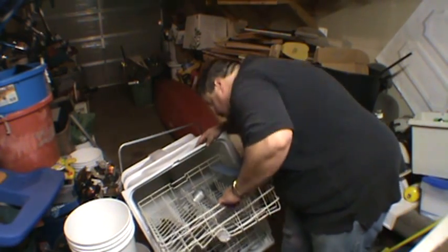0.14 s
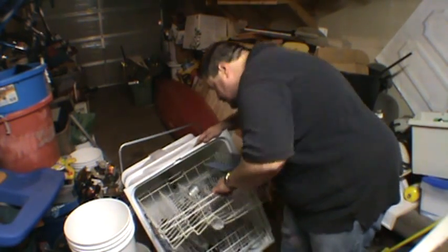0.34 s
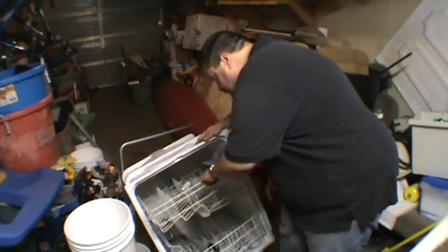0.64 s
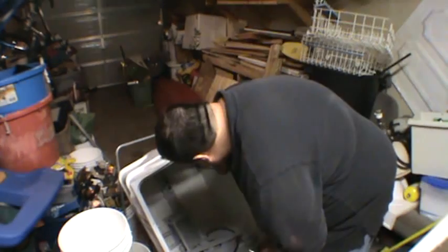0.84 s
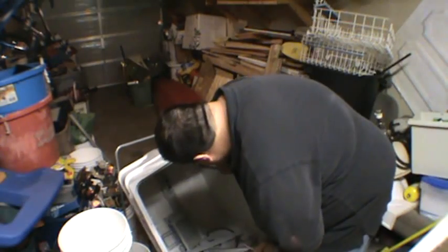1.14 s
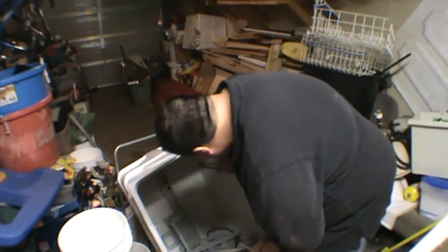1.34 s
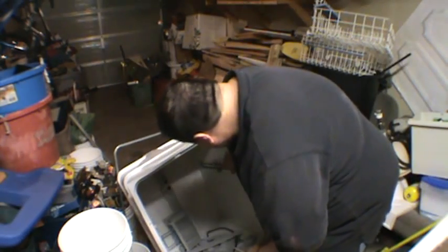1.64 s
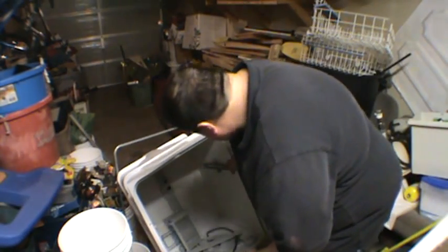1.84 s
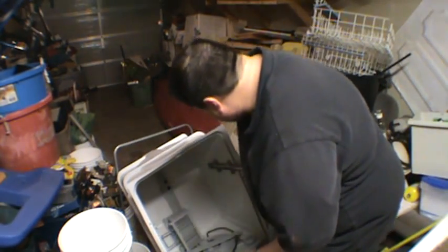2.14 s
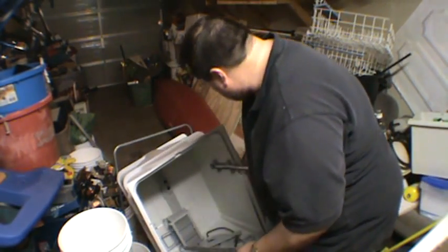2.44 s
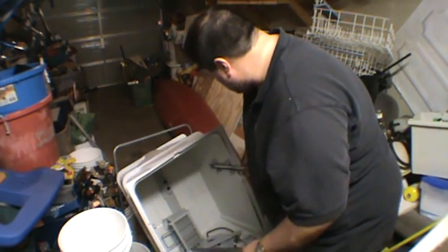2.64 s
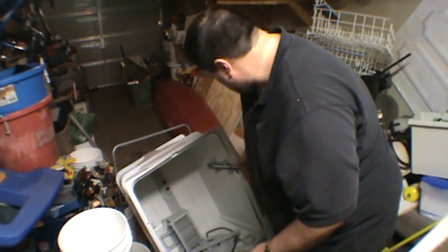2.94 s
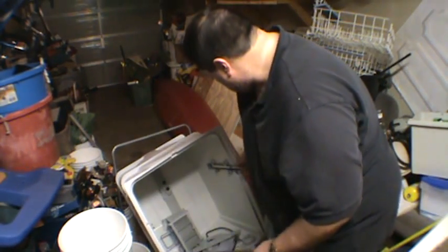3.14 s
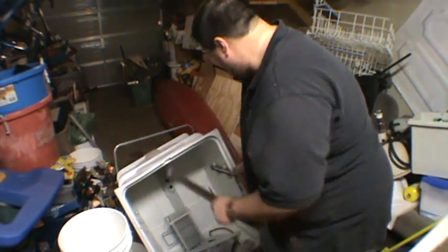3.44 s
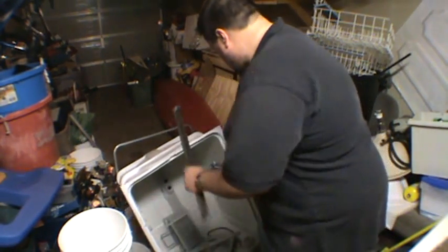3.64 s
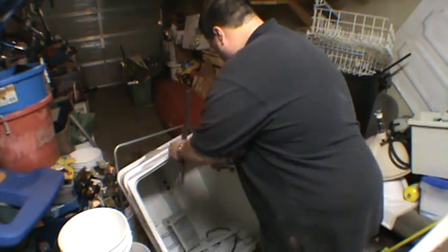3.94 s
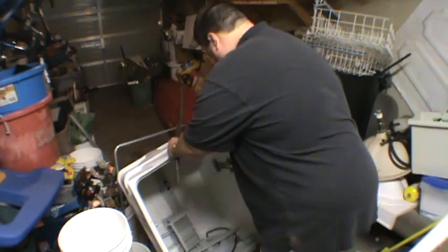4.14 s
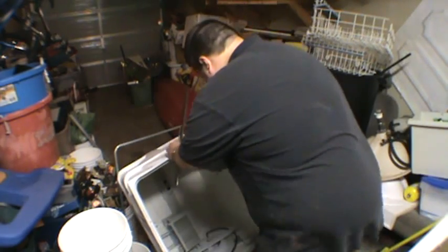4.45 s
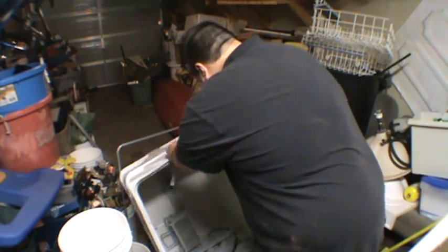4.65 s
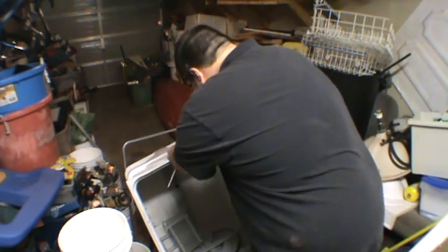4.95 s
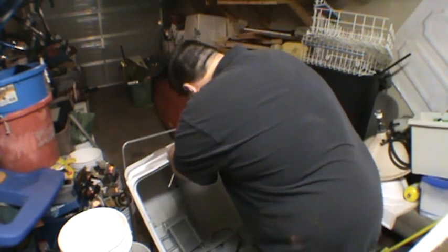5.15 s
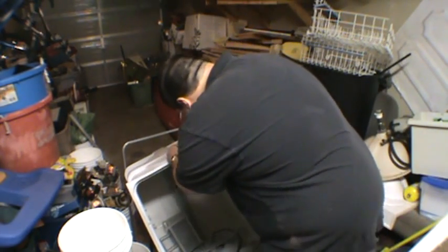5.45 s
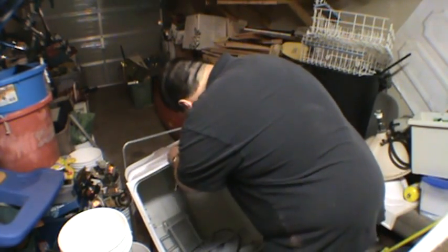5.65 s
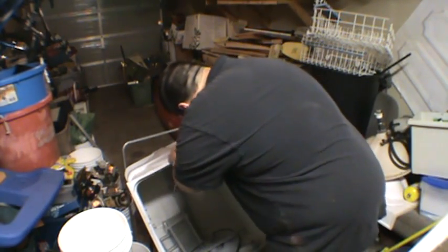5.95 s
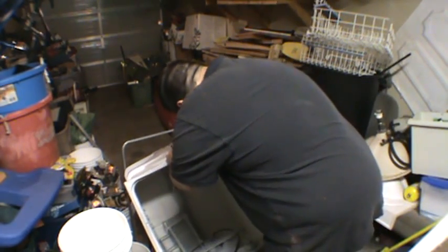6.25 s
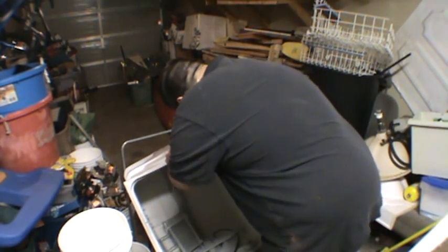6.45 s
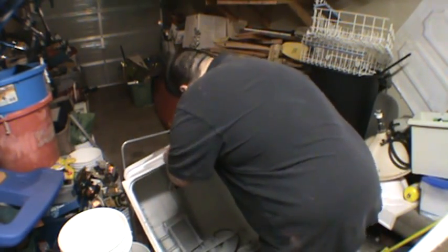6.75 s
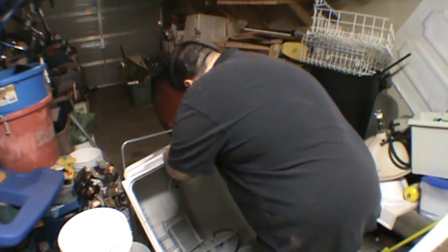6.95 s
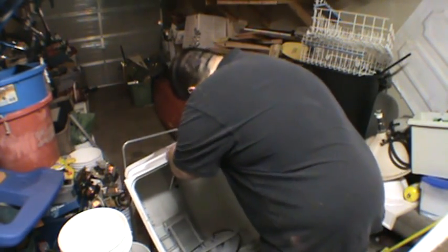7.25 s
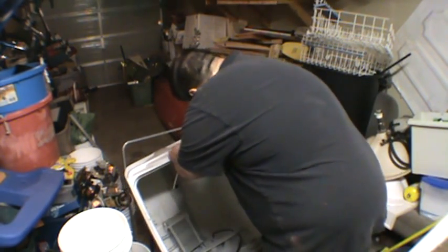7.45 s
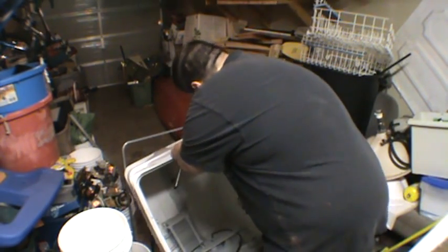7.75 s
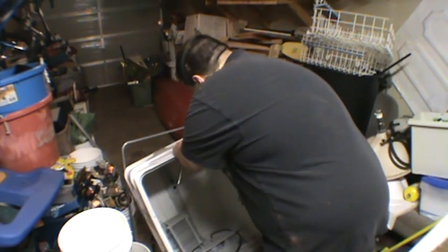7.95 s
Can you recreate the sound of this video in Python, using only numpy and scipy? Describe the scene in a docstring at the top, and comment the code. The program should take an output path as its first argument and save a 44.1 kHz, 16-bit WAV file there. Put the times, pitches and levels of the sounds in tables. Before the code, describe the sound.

In a cluttered garage, wire racks stutter and jangle along the rails of a tipped dishwasher, with a bright clank early on. Uneven knocks and rattles follow, then a hollow tub boom and steel rasping. After a quieter spell come a heavy double clank and later one hard crash, followed by faint fumbling and a small metallic clack. Close microphone, short room echo, low quiet hiss.

```python
"""Dishwasher pulled apart in a garage

A dishwasher lies on its back while its racks and rails are dragged, knocked and levered loose.
Blows and stuttering contacts are noise shaped by the resonances of sheet, wall, wires and rails;
chinks, taps, a clack and tub booms are decaying sines. Decaying noise supplies the room, steady noise
and a thin whine the still air. Loud crashes meet a ceiling; early on the level dips once, briefly.
"""
import sys
import numpy as np
from scipy import signal
from scipy.fft import rfft, irfft, next_fast_len
from scipy.io import wavfile
from scipy.ndimage import uniform_filter1d, minimum_filter1d

SR = 44100
rng = np.random.default_rng(int(sys.argv[2]) if len(sys.argv) > 2 else 0)


def dump(signal):
    """Clip the signal to [-1, 1] and save it as 16-bit WAV at the path in sys.argv[1]."""
    limited = np.clip(np.atleast_2d(signal).T, -1, 1)
    pcm = np.round(limited * 32767).astype(np.int16)
    wavfile.write(sys.argv[1], SR, pcm)


N = 357077

# Spectrum of racks and sheet metal: [f/Hz, relative density/dB]
SHEET_SPECTRUM = [(530, -23), (900, 2.5), (1210, -6), (1700, 0.5), (3570, -1), (5440, -1.5), (6990, -6),
                  (7600, -5), (10400, -21.5), (12300, -18.5), (15800, -58)]
# Resonances of the tub wall: [f/Hz, width/Hz, relative level/dB]
WALL_MODES = [(386.3, 83.5, 1), (505, 72.4, 0), (617, 141, -6), (826, 65, -4.5), (1200, 420, -11.5)]
# Resonances of the steel rails: [f/Hz, width/Hz, relative level/dB]
RAIL_MODES = [(1375, 370, 4.5), (2150, 300, 0), (8610, 730, 2), (10830, 300, 0.5), (11540, 160, 3),
              (12150, 320, 2), (13300, 380, -7.5)]
# Resonances of the rack wires: [f/Hz, width/Hz, relative level/dB]
RACK_MODES = [(3010, 70, 0), (3400, 50, 0), (3770, 50, 0), (4770, 80, 1), (5330, 90, 1), (5610, 80, 0),
              (5970, 60, 0), (6750, 40, -2), (7240, 60, -2)]


def amp(db):
    """Level to amplitude ratio: 20 dB are a factor of ten."""
    return 10 ** (np.asarray(db) / 20)


def unit(x):
    """Normalisation to an rms value of 1."""
    return x / np.sqrt(np.mean(x ** 2) + 1e-20)


def peak(x):
    """Normalisation to a peak value of 1."""
    return x / np.abs(x).max()


def along(points, hz):
    """Interpolation of (f/Hz, value) points on a logarithmic frequency axis."""
    f, v = np.transpose(points)
    return np.interp(np.log(hz + 1), np.log(f + 1), v)


def filtered(x, response):
    """Linear filtering: the spectrum is multiplied by a complex frequency response."""
    m = next_fast_len(x.shape[-1] + SR // 4)  # zero padding leaves room for the ringing
    spectrum = rfft(x, m) * response(np.fft.rfftfreq(m, 1 / SR))
    return irfft(spectrum, m)[..., :x.shape[-1]]


def resonant(modes):
    """Modal superposition: causal damped resonators summed with alternating sign."""
    def response(f):
        total = 0
        for k, (centre, width, db) in enumerate(modes):
            damping = 1j * f * width
            total = total + (-1) ** k * amp(db) * damping / (centre * centre - f * f + damping)
        return total
    return response


def coloured(spectrum):
    """Spectral shaping: the zero-phase response through (f/Hz, level/dB) points."""
    return lambda hz: amp(along(spectrum, hz))


def chatter(per_s, spread_db, life_s):
    """Stick-slip contact noise: random impacts of uneven size, each an exponentially dying noise burst."""
    impacts = rng.random(N) < per_s / SR
    sizes = impacts * amp(spread_db * rng.standard_normal(N))
    # The small constant keeps a faint contact between impacts
    envelope = signal.lfilter([1], [1, -np.exp(-1 / (life_s * SR))], sizes + 1e-4)
    return unit(envelope * rng.standard_normal(N))


def ringing(modes, t, chance):
    """Free vibration: decaying sines of (f/Hz, t60/s, level/dB), each struck at a strength set by chance."""
    total = 0
    for (hz, t60, db), c in zip(modes, chance):
        total = total + amp(db + 4 * c - 60 * t / t60) * np.sin(2 * np.pi * hz * t)
    return total


def strokes(rows, fall_db_per_s):
    """Energy addition: strokes that swell, hold and die give a gain for each level column."""
    swell_db = 22.5  # growth over about one rise time
    rows = np.array(rows)
    t = np.arange(0, N, 32) / SR
    full_s, rise_s, hold_s = rows[:, :3].T[..., None]
    before_db = swell_db * np.clip(full_s - t, 0, None) / (np.abs(rise_s) + 1e-3)
    after_db = fall_db_per_s * np.clip(t - full_s - np.abs(hold_s), 0, None)
    power = amp(2 * rows[:, 3:].T) @ amp(2 * (-before_db - after_db))
    return [np.interp(np.arange(N) / SR, t, np.sqrt(p)) for p in power]


def hush():
    """Stationary background: shaped noise, independent in mid and side, with a steady sine whine in both."""
    # Spectrum of the still garage: [f/Hz, relative density/dB]
    air_spectrum = [(15, -33), (25, -3), (55, 2), (80, -6), (125, 2), (205, -12), (403, -10.5),
                    (691, -14.5), (834, -12), (1060, -22), (1250, -17.5), (4100, -23.5), (15800, -33)]
    # Thin whine: [f/Hz, amplitude level/dB]
    whine_hz, whine_db = (12280, -85)
    noise = unit(filtered(rng.standard_normal((2, N)), coloured(air_spectrum)))
    whine = np.sin(2 * np.pi * whine_hz * np.arange(N) / SR)
    return amp(-51.5) * noise + amp(whine_db) * whine


def garage(x, step=8192):
    """Diffuse reverberation: convolution with decaying noise, mid and side."""
    # Reverberation time of the room: [f/Hz, t60/s]
    decay_times = [(100, .33), (500, 0.28), (2000, 0.39), (5000, 0.33), (12000, 0.21)]
    delay = 130  # samples before the echoes begin
    out = np.zeros((2, N + SR))
    # The work moves about, so each stretch meets other echoes
    for start in range(0, N, step):
        hz, t, bins = signal.stft(rng.standard_normal((2, SR // 2)), SR, nperseg=256)
        decay = amp(-60 * t / along(decay_times, hz)[:, None])
        tail = signal.istft(bins * decay, SR, nperseg=256)[1]
        tail = tail / np.linalg.norm(tail[0])
        wet = signal.fftconvolve(x[None, start:start + step], tail, axes=1)
        out[:, start + delay:start + delay + wet.shape[1]] += wet
    return out[:, :N]


def chinks():
    """Amplitude-modulated free vibration: a small hard part rings high and jingles on after the touch."""
    # Touches of the part: [t/s, relative level/dB]
    touches = [(0.173, -45.5), (0.4898, -34), (0.5746, -21), (0.805, -34), (1.0536, -38), (1.196, -36),
               (1.86, -41), (2.0023, -36), (2.248, -26), (2.3513, -38), (2.552, -38), (3.0959, -46),
               (3.7633, -33), (4.135, -44), (5.4041, -42.5), (5.563, -35), (6.779, -29.5), (7.023, -37.5),
               (7.239, -32.5)]
    # Modes of the part: [f/Hz, t60/s, relative level/dB]
    part_modes = [(7480, 0.17, 7), (7600, 0.16, 0.5), (7660, .08, -1), (7840, 0.068, 5), (12150, 0.08, -4)]
    out, t = np.zeros(N + SR), np.arange(SR // 4) / SR
    for s, db in touches:
        jingle = np.abs(uniform_filter1d(rng.standard_normal(len(t)), size=130)) * 10 + 0.2
        ring = ringing(part_modes, t, rng.standard_normal(len(part_modes)) / 2)
        ring = ring * (1 - np.exp(-t / 0.00097))
        out[round(s * SR):][:len(t)] += amp(db + 3.5) * peak(jingle * ring)
    return out[:N]


def clack():
    """Free vibration of a bar: it slips onto the tub edge and rings briefly in its low modes."""
    # The slip: [t/s, relative level/dB]
    slip_s, slip_db = (7.886, -24.5)
    # Modes of the bar: [f/Hz, t60/s, relative level/dB]
    bar_modes = [(1300, 0.096, 0), (1484, 0.07, 3), (1940, 0.12, 0.5), (2230, 0.081, -2)]
    t = np.clip(np.arange(N) / SR - slip_s, 0, None)  # the sines stay at zero until the slip
    return amp(slip_db - 7.0) * ringing(bar_modes, t, rng.standard_normal(len(bar_modes)) / 2)


def taps():
    """Single-mode excitation: a knuckle or a rail end sets one panel of the wall ringing briefly."""
    # Soft taps on the tub wall: [t/s, level/dB, f/Hz]
    touches = [(0.276, -36, 404), (3.029, -22, 436), (3.357, -25, 430), (4.154, -36, 471),
               (4.399, -30, 495), (4.458, -36, 393), (4.525, -35, 482), (4.605, -21, 520),
               (4.625, -20, 760), (5.332, -40, 382), (5.842, -45, 412), (7.662, -44, 412),
               (7.809, -29, 468), (8.026, -35, 487)]
    t60_s, rise_s = 0.07, 0.003
    out, t = np.zeros(N + SR), np.arange(SR // 4) / SR
    shape = peak(amp(-60 * t / t60_s) * (1 - np.exp(-t / rise_s)))
    for s, db, hz in touches:
        out[round(s * SR):][:len(t)] += amp(db) * shape * np.sin(2 * np.pi * hz * t)
    return out[:N]


def bumps():
    """Low resonance of a hollow body: the tub bumps on the floor and swells into a boom of a few cycles."""
    # Bumps of the tub: [t/s, level/dB, f/Hz]
    knocks = [(0.6, -25.5, 128), (0.886, -37, 136), (1.07, -26, 112.5), (1.699, -32, 136),
              (2.259, -26, 109), (2.985, -24, 127), (2.99, -27, 52), (3.054, -12.5, 140.8),
              (3.724, -25.5, 148), (4.308, -23.5, 114), (4.538, -28, 119), (4.671, -22.5, 131),
              (4.789, -19.5, 114), (4.959, -27, 140), (5.575, -26, 123.8), (6.442, -30.5, 147),
              (6.606, -18, 136.3), (6.648, -17.5, 109.4), (6.7, -23, 120), (6.934, -34, 108),
              (7.814, -27, 147.4)]
    swell_s, t60_s = 0.007, 0.14
    out, t = np.zeros(N + SR), np.arange(SR // 2) / SR
    shape = peak(amp(-60 * t / t60_s) * (1 - np.exp(-t / swell_s)) ** 2)
    for s, db, hz in knocks:
        boom = np.sin(2 * np.pi * hz * t) + 0.3 * np.sin(2 * np.pi * 1.48 * hz * t)
        out[round((s - swell_s) * SR):][:len(t)] += amp(db) * shape * boom
    return out[:N]


def rasping():
    """Friction-driven resonance: a rail slides on steel and sings in its own modes."""
    # Steel rasping on steel: [t at full strength/s, rise/s, hold/s, level/dB]
    slides = [(3.43, 0.099, .06, -36), (3.68, 0.15, 0.05, -39), (4.635, .004, 0.027, -29.5),
              (4.76, .1, 0.023, -32), (6.115, .004, .19, -52.5), (7.89, 0.042, 0.0038, -33.5),
              (8.02, 0.09, .01, -55)]
    gain = strokes(slides, fall_db_per_s=266)[0]
    contacts = chatter(600, spread_db=3.5, life_s=0.0066)
    return gain * unit(filtered(contacts, resonant(RAIL_MODES)))


def dragging():
    """Forced vibration: wheels and wires stutter along the rails and shake every part of the machine."""
    # Pulls: [t at full strength/s, rise/s, hold/s, rattle level/dB, rumble level/dB, wall level/dB]
    pulls = [(.2, .1, 0.13, -58, -53, -49), (.45, 0.36, 0.092, -47, -46.5, -40.5),
             (.59, .02, 0.041, -41, -37, -34), (.81, 0.042, .32, -48, -45, -48.5),
             (1.52, .02, .02, -44, -42, -60), (1.66, .02, .05, -42, -44, -45),
             (2.03, 0.56, .01, -40.5, -39.5, -34), (2.14, 0.055, 0.26, -43, -47, -42),
             (2.52, 0.035, 0.15, -47, -44, -44.5), (2.95, 0.018, .005, -42, -46, -44),
             (3.03, .1, 0.0044, -55, -50, -29.5), (3.4, 0.2, 0.092, -36, -37, -32),
             (3.58, 0.093, 0.11, -44, -43, -34), (3.7, .12, .055, -35.5, -38, -27.5),
             (4.23, 0.15, 0.32, -53.5, -45, -44.5), (4.53, 0.11, .04, -39, -45, -36),
             (4.59, .025, .11, -27, -27, -25.5), (4.73, 0.092, .04, -28, -22, -19.5),
             (4.9, .05, 0.097, -44.5, -41, -41), (5.4, 0.59, 0.016, -62, -49.5, -49.5),
             (5.61, 0.12, .02, -58, -52, -51), (5.86, .04, .13, -66, -52, -58),
             (6.2, 0.3, 0.23, -48, -40.5, -43.5), (6.52, .03, .04, -60, -49, -54),
             (6.585, 0.012, .105, -26.5, -27.5, -25.5), (6.76, 0.06, 0.11, -44, -38, -41),
             (7.16, .04, .22, -51, -47, -46), (7.4, .05, .09, -64, -48, -43),
             (7.68, .06, .1, -55, -49, -51), (7.82, .1, .07, -49, -37.5, -38),
             (8.08, 0.33, .05, -59, -48, -43.5)]
    # Air and panels of the tub: [f/Hz, width/Hz, relative level/dB]
    tub_modes = [(50, 7.3, -4), (113.4, 13, 1.5), (150, 13, 1), (215, 32, -6)]
    rattle_gain, rumble_gain, wall_gain = strokes(pulls, fall_db_per_s=198)
    rattle = unit(filtered(chatter(600, spread_db=1.5, life_s=0.006), coloured(SHEET_SPECTRUM)))
    jangle = unit(filtered(chatter(150, spread_db=3, life_s=0.003), resonant(RACK_MODES)))
    rumble = unit(filtered(chatter(200, spread_db=1.5, life_s=0.015), resonant(tub_modes)))
    wall = unit(filtered(chatter(500, spread_db=2.5, life_s=0.0068), resonant(WALL_MODES)))
    return rattle_gain * (rattle + amp(-12) * jangle) + rumble_gain * rumble + wall_gain * wall


def blows():
    """Impact excitation: short noise bursts drive sheet, wall, rail and wires; a weaker blow starts softer."""
    # Blows on rack and rails: [t/s, level/dB, knock relative level/dB, rail relative level/dB,
    # tilt of the crack/(dB per octave), struck wire f/Hz]
    hits = [(0.1656, -41.5, -3, -17, 2, 4070), (0.371, -28.5, -6, -15, -5.5, 2370),
            (0.4905, -29.5, -22, -0.5, 2, 5900), (0.5742, -16, -11.5, -4.5, 8, 5650),
            (0.925, -26.5, -10, -6.5, 10, 4730), (1.0051, -29.5, -18, -15, -4.3, 3500),
            (1.0501, -30.5, -2, -21, 2.5, 6040), (1.1865, -31, -2, -2, 1.5, 5190),
            (1.507, -30, -2.5, -28, 0.5, 3440), (1.6494, -30, -4, -52, -2.5, 1450),
            (1.706, -26, -12, -13, -3, 1660), (1.8556, -33, -9, -39, 4.5, 5350),
            (1.897, -26.5, -16, -40, -2, 3330), (2, -22, -9.5, -22, -4.5, 5130),
            (2.0682, -30, -17, -39.5, -1, 3440), (2.1229, -23, -22, -30, -1, 3230),
            (2.1593, -26.5, -21, -26, -1, 5050), (2.237, -16.5, -11, -13, 1.5, 5400),
            (2.3357, -25, -18, -33, -3, 3050), (2.356, -29.5, -21, -30, -6, 3920),
            (2.409, -28.5, -15, -29, -6.5, 2200), (2.5239, -20.5, -7.5, -33.5, -1.3, 5200),
            (2.6, -24, 0, -34, 0, 5270), (2.7113, -32, -10.5, -30, -6, 1570),
            (2.9273, -35, -7.5, -38, -6, 1910), (2.992, -24.5, -7.5, -14, -3.5, 1800),
            (3.028, -31, 2, -30, -12, 800), (3.0953, -36, -19, -21, 1, 4560),
            (3.3102, -24.5, -8, -27, -6, 2180), (3.3717, -27.5, -7, -2, -1.5, 1310),
            (4.133, -34.5, -3, -7, -1, 1850), (4.2939, -33.5, -20, -18, 0.5, 1773),
            (4.3198, -34.5, -6.5, -26, -4, 1840), (4.5155, -31.5, -3.5, -20, -4, 1800),
            (4.578, -19, -6, -28, -3, 3180), (4.6338, -11.5, -8.5, -6, 8, 5800),
            (4.7165, -10, -4, -17, -14, 1100), (4.8918, -20, -18, -36, -1.5, 3300),
            (5.085, -30, -35, -36, 0, 1800), (5.383, -43.5, -12, 0.5, 4, 3260),
            (5.554, -30, -4, -24, -1.5, 2480), (5.5734, -21.5, -10, -12, -1, 6040),
            (6.015, -29.5, -10.5, -4.5, -1.8, 2300), (6.111, -28, -18, -4, 4, 3080),
            (6.1573, -31.5, -2.5, -5, 2, 2350), (6.1977, -32.5, 0.5, 0, 4, 3630),
            (6.2459, -32, 2.5, -9, 4, 2630), (6.339, -36.5, -12, -22, 4, 3120),
            (6.3933, -39.5, 4.5, -8.5, -1, 1720), (6.5737, -5.5, -3, -30, 2.8, 4740),
            (6.82, -38, -3, -29, -4, 1620), (6.9352, -43.5, -16, -27, -2, 2680),
            (7.01, -42, -4, -20, -2, 900), (7.2451, -39, -14, 3, 2, 4660),
            (7.7989, -34.5, 3.5, -26, 2, 1600), (7.8688, -34, -23, 7, -5, 1920),
            (7.8848, -31.5, -20, 2, 4.5, 1520)]
    racks_until_s = 2.9  # while the racks are in, they ring along
    out, t = np.zeros(N + SR), np.arange(SR // 4) / SR
    for s, db, knock_db, rail_db, tilt_db, wire_hz in hits:
        rise = 1 - np.exp(-t / (0.0015 + 0.0001 * abs(db)))

        def driven(t60, response):
            burst = rng.standard_normal(len(t)) * amp(-60 * t / t60) * rise
            return peak(filtered(burst, response))

        def tilted_sheet(hz):
            return amp(along(SHEET_SPECTRUM, hz) + tilt_db * np.log2(hz / 3000 + 0.12))

        crack = driven(0.09, tilted_sheet)
        knock = driven(0.09, resonant(WALL_MODES))
        rail = driven(0.11, resonant(RAIL_MODES))
        struck = driven(0.077, resonant([(wire_hz, 140, 0)]))
        # Each blow favours other wires
        favour_db = 5 * rng.standard_normal(len(RACK_MODES))
        wires = np.array(RACK_MODES) + np.outer(favour_db, [0, 0, 1])
        rack = driven(0.06, resonant(wires)) * (s < racks_until_s)
        sound = amp(3) * crack + amp(knock_db + 6) * knock + amp(rail_db) * rail
        sound += amp(-7) * struck + amp(-5) * rack
        out[round(s * SR):][:len(t)] += amp(db) * sound
    return out[:N]


def scene():
    """Superposition of direct and diffuse sound, with mid and side decoded to left and right."""
    # Share of the room in the mid: [f/Hz, level/dB]
    mid_share = [(60, -12.5), (200, -10.5), (450, -4.5), (1000, -5.5), (12000, -0.5)]
    # Share of room and air in the side: [f/Hz, level/dB]
    side_share = [(40, -34), (120, -19), (240, -14), (480, -11), (950, -9), (1900, -8.5), (3800, -10.5),
                  (8000, -11), (11500, -6), (11900, -45)]
    # Share of the mid that leans left: [f/Hz, share]
    left_lean = [(80, 0.012), (180, 0.082), (350, -0.066), (700, -0.041), (2000, 0.045)]
    # Phase by which left leads right: [f/Hz, phase/rad]
    left_leads = [(100, .01), (500, .2), (3000, .2), (8000, .01)]

    def to_side(hz):
        placed = along(left_lean, hz) + 1j * along(left_leads, hz) / 2
        return placed * (hz < side_share[-1][0])

    machine = blows() + clack() + chinks() + bumps() + taps() + dragging() + rasping()
    room, air = garage(machine), hush()
    mid = amp(0.5) * machine + filtered(room[0], coloured(mid_share)) + air[0]
    side = filtered(room[1] + amp(4.0) * air[1], coloured(side_share))
    side += filtered(mid, to_side)
    return np.array([mid + side, mid - side])


def record(dry):
    """Dynamic range compression to an rms ceiling, then one brief dip of level and a band limit."""
    # Dip, after which the level stays at the last value: [t/s, level/dB]
    dip = [(.745, 0), (.765, -3), (.778, -27), (.788, -30), (.797, -4.5)]
    ceiling_db, top_hz = -16, 15800
    level = np.sqrt(np.abs(uniform_filter1d(np.mean(dry ** 2, axis=0), size=330)))
    needed = np.minimum(1, amp(ceiling_db) / (level + 1e-9))
    gain = uniform_filter1d(minimum_filter1d(needed, size=600), size=400)
    gain = np.roll(gain, 330)  # it reacts late, so the first crack overshoots
    dip_s, dip_db = np.transpose(dip)
    dip_gain = amp(np.interp(np.arange(N) / SR, dip_s, dip_db))
    return filtered(dry * gain * dip_gain, lambda hz: hz < top_hz)


dry = scene()
out = record(dry)
dump(out)
```